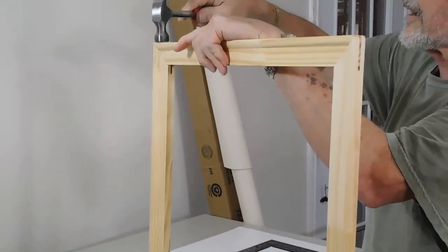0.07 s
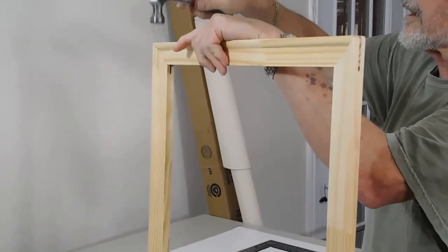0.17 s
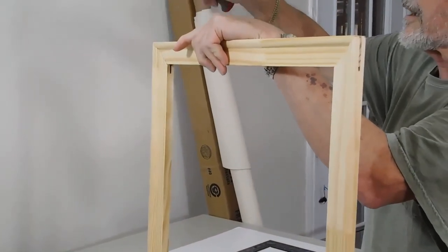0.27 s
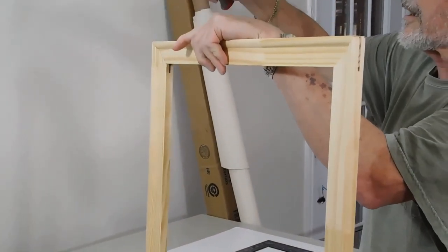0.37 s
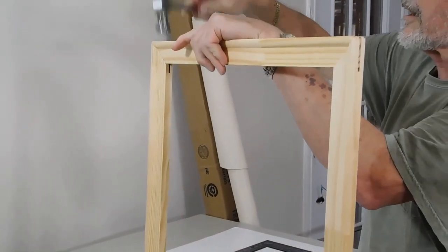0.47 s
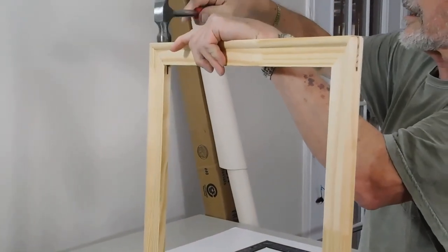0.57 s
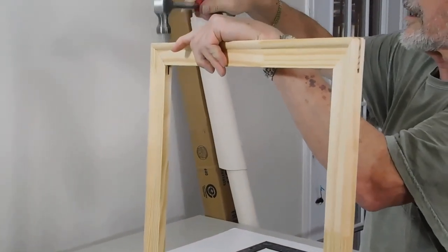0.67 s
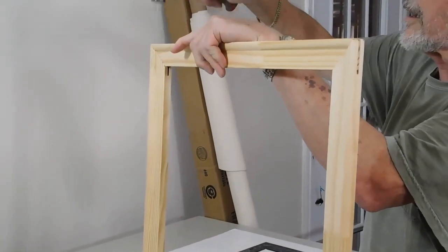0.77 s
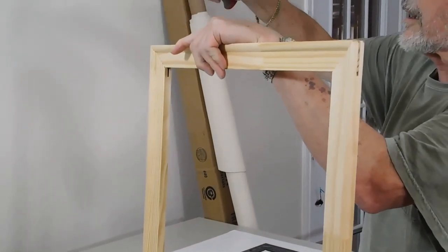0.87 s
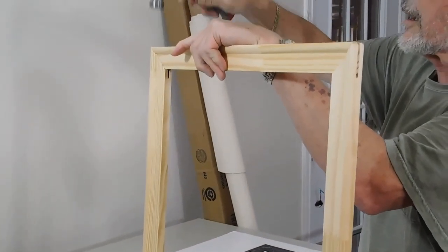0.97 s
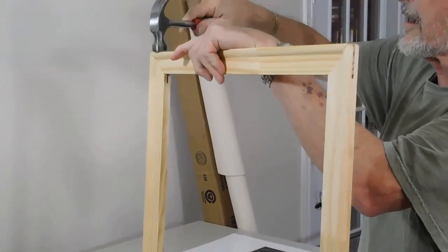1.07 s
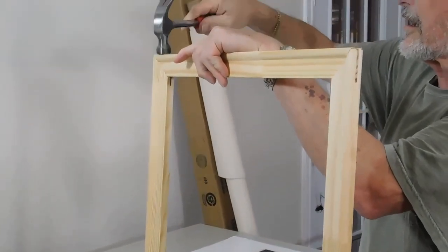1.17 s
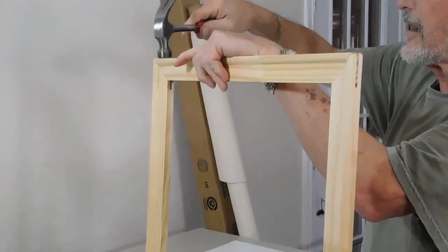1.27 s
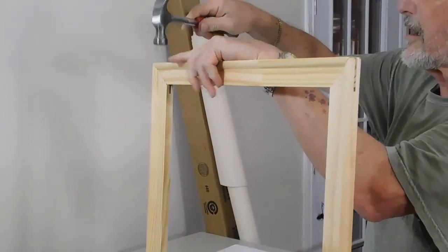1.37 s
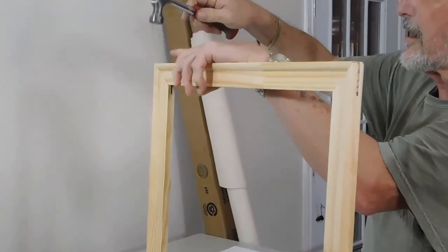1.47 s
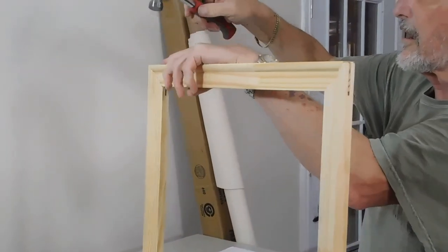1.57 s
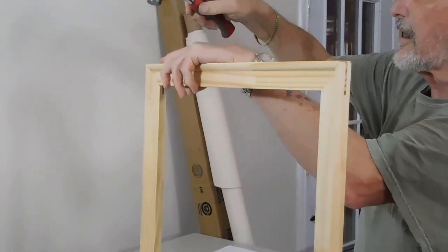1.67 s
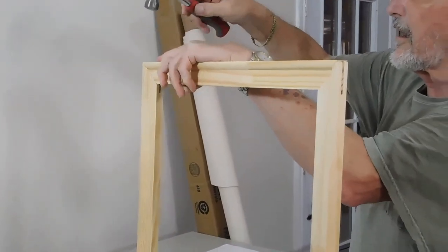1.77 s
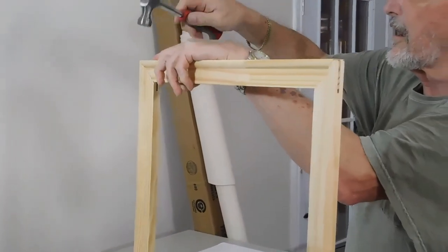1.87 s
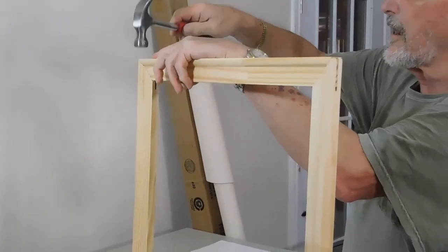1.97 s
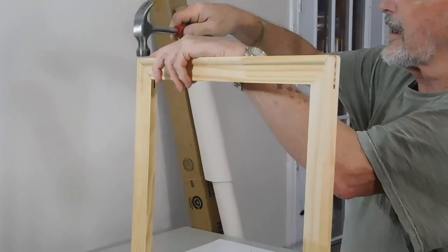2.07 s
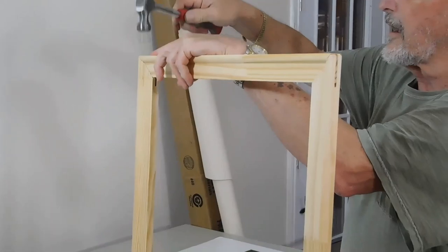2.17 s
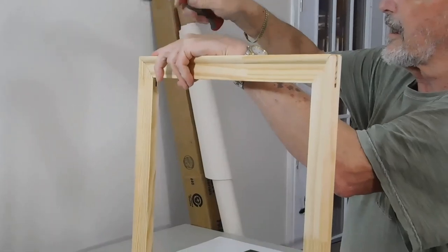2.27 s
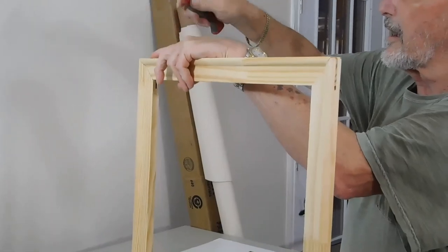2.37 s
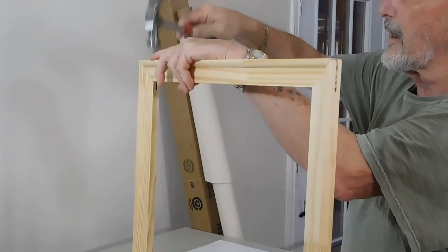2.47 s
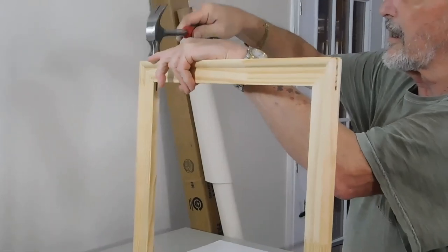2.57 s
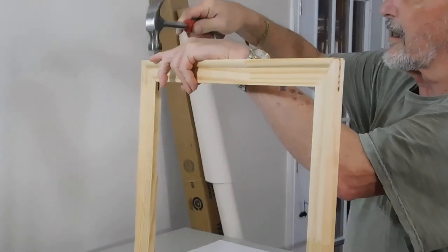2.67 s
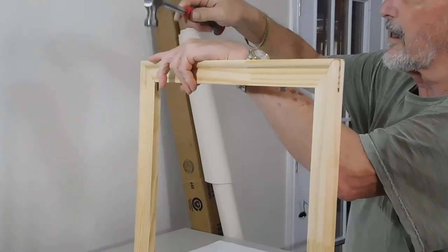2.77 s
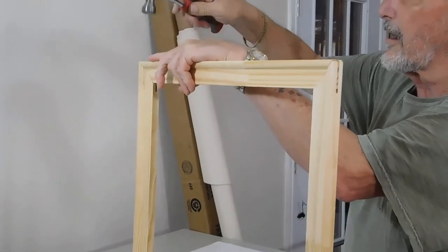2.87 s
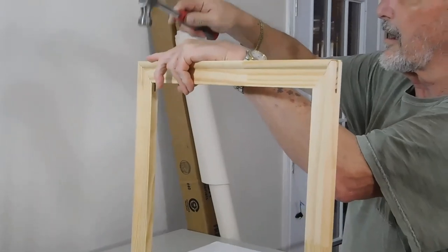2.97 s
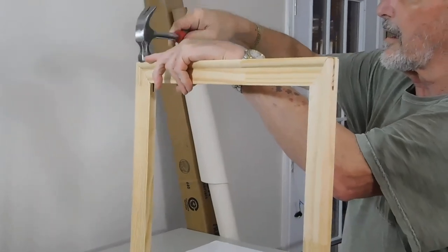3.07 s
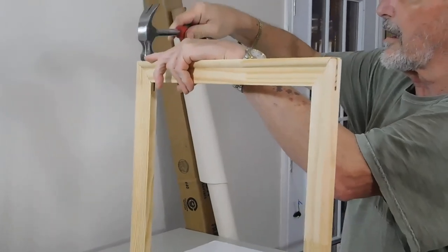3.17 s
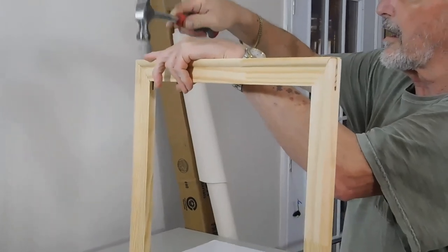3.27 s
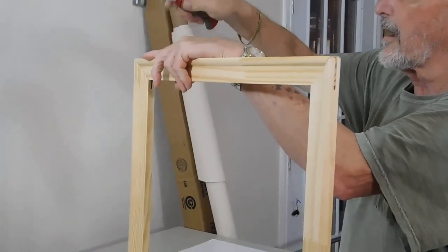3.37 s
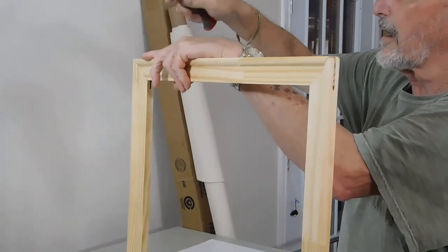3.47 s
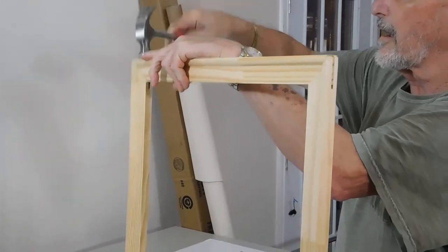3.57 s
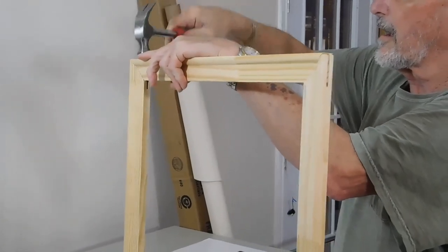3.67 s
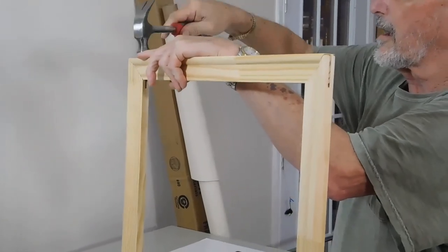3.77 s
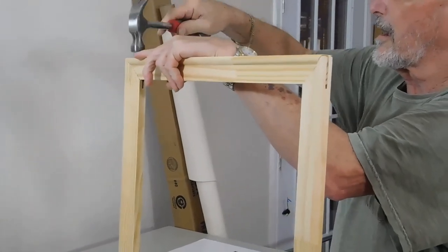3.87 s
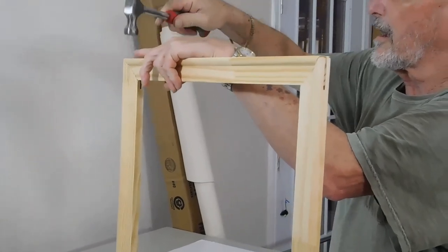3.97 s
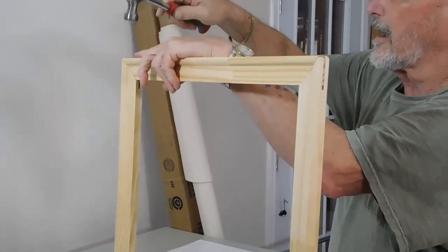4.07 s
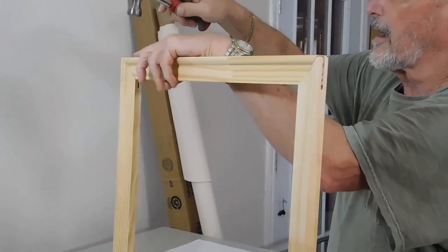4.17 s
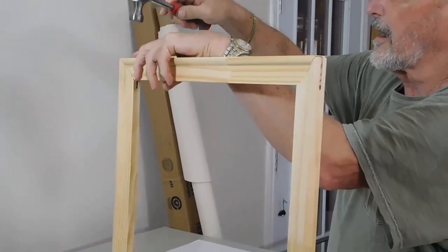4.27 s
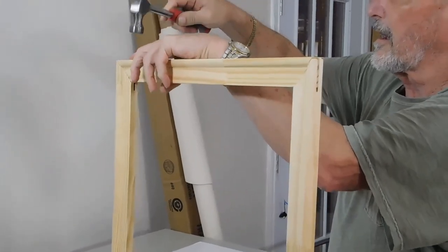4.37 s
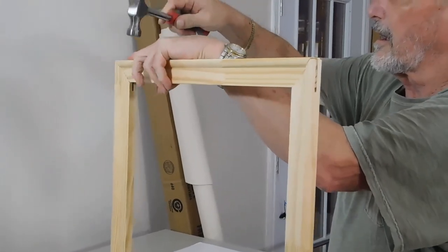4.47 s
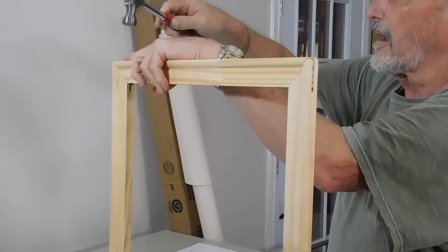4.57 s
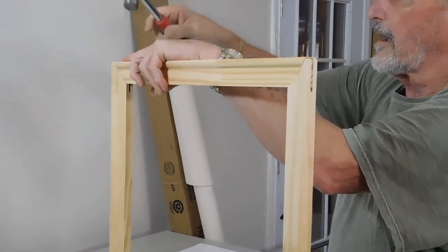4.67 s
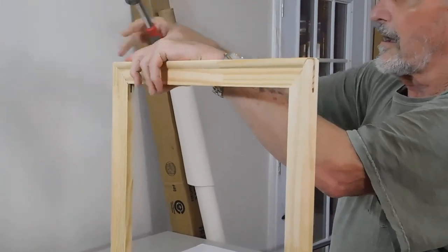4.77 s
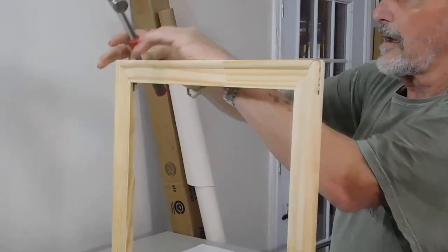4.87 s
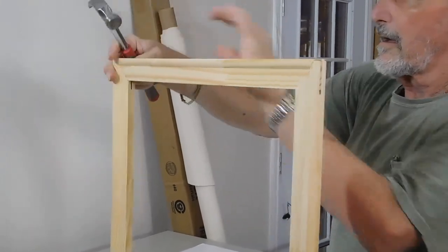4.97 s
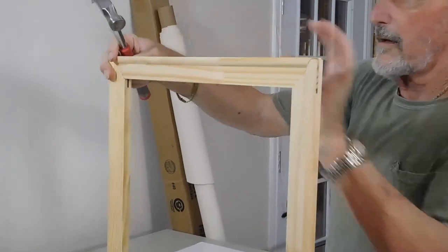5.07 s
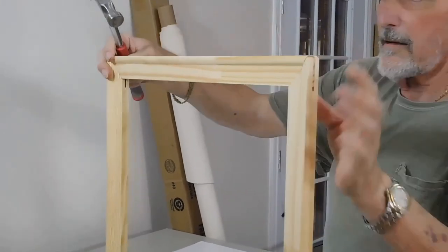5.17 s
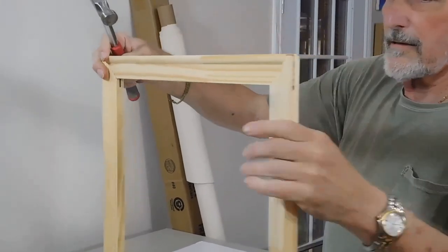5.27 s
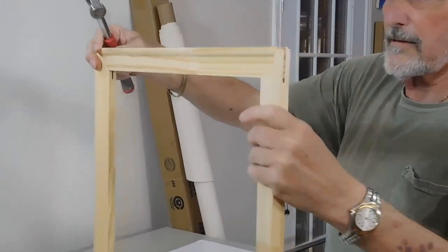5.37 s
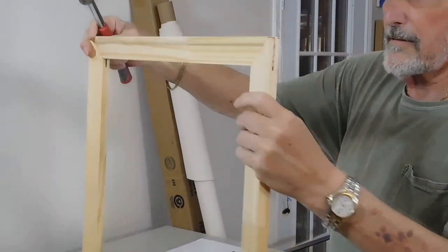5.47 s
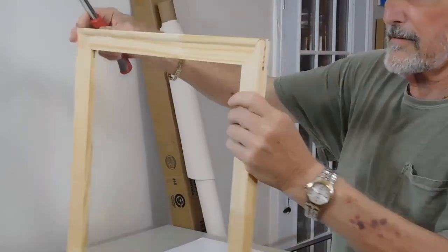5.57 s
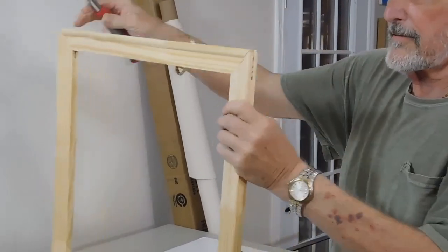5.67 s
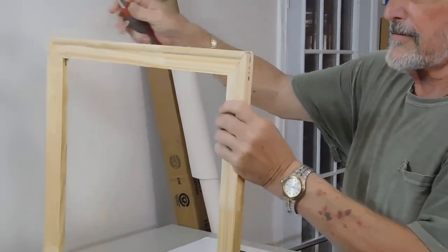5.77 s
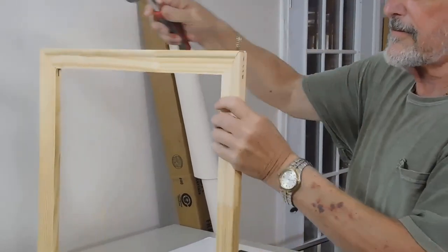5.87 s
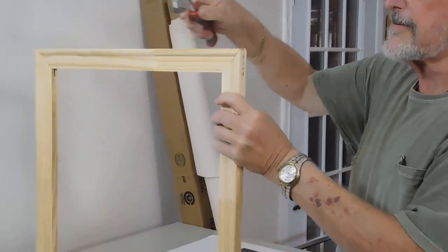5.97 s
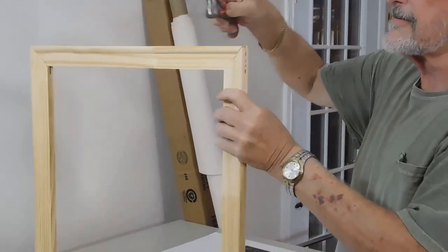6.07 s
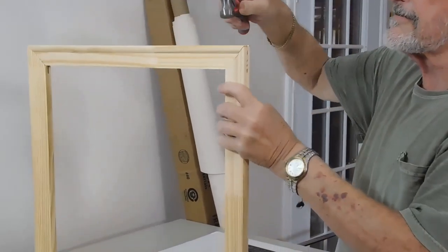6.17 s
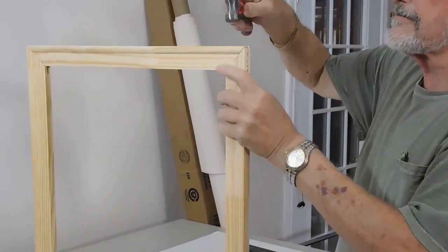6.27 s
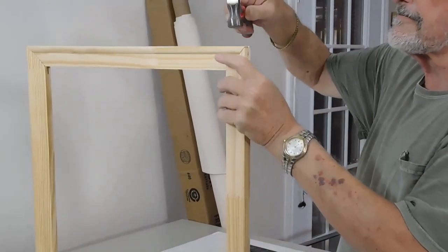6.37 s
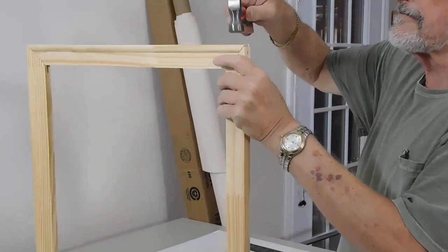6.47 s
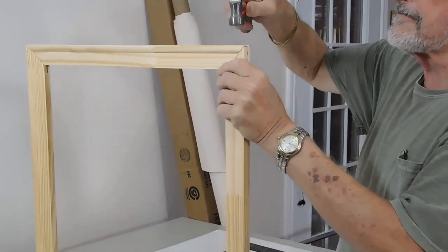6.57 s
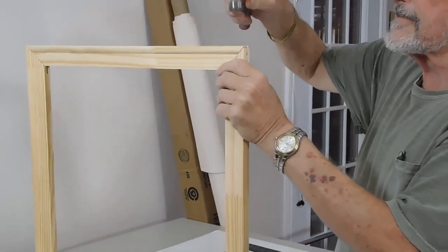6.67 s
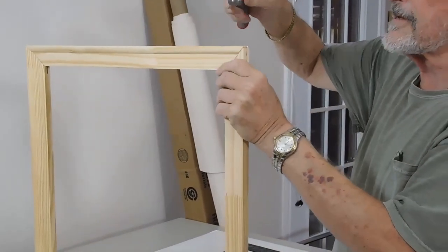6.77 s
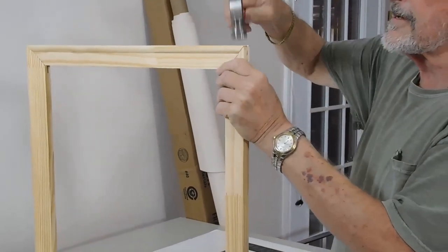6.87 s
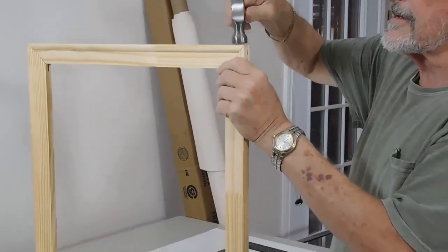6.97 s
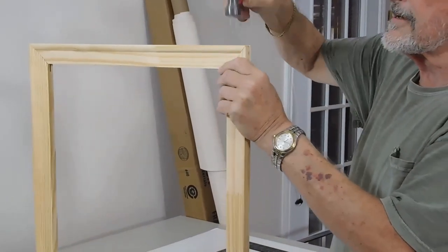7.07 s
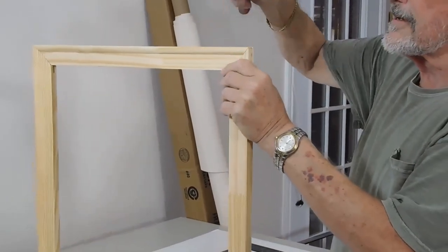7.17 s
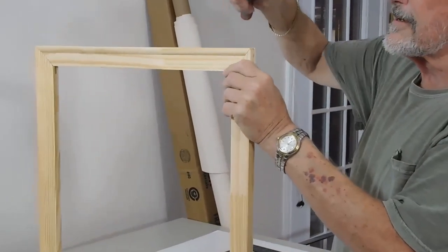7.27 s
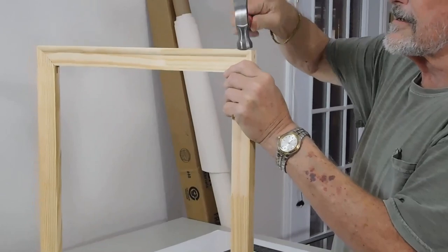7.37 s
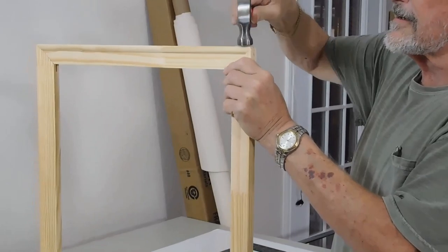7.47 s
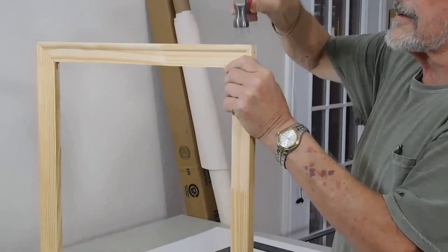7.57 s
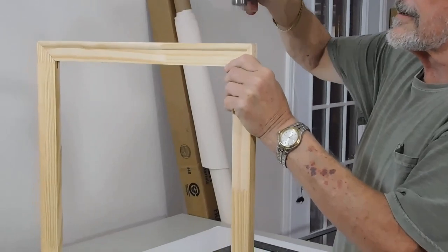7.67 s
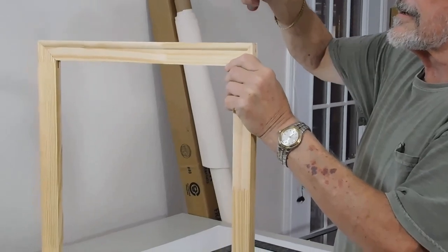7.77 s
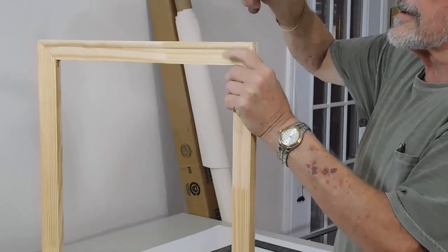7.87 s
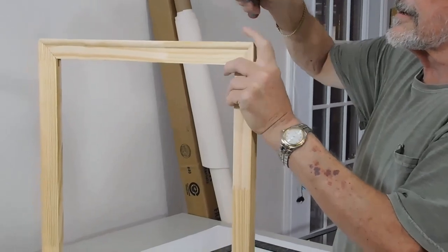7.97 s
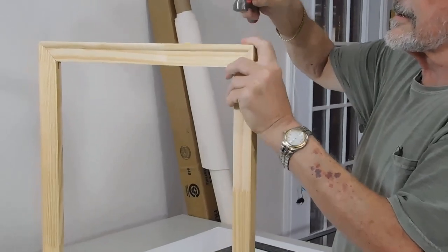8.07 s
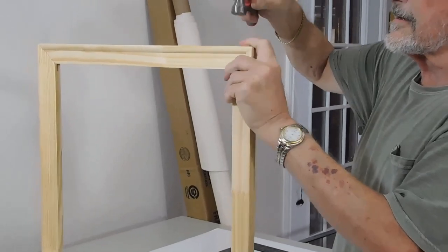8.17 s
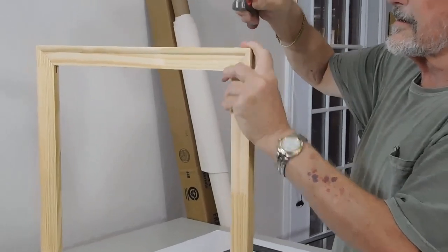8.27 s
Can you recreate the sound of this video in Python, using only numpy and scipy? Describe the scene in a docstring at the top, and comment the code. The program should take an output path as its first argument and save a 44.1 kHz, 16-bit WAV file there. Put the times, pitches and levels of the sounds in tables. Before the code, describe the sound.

In a hard, reverberant room with faint air noise and fan hum, a hammer strikes a light pine frame resting on a table. Loud, short woody knocks with a steely edge come about half a second apart, with one gap holding only a very weak tap. Then fingers tick, cloth rustles, the frame shifts and softly bumps the table. Two bright taps on the other corner follow, ending in a soft thumb rub. Close stereo microphone, peaks slightly squashed.

```python
"""A hard, echoing room with faint fan hum: a hammer taps the left corner of a pine frame on a table, seven times.
Fingers tick and cloth rustles, a hand rubs the wood, and the frame is shifted and bumps the table.
Two taps on the right corner follow, and last a thumb rubs over the joint.
Each blow rings short modes of wood and steel, cracks more the harder the contact, and can jolt the furniture.
At the microphones loud peaks round off; the recorder's limiter holds the blows down and lets go in the echo."""
import sys
import numpy as np
from scipy import signal
from scipy.fft import rfft, irfft
from scipy.io import wavfile

SR = 44100
rng = np.random.default_rng(int(sys.argv[2]) if len(sys.argv) > 2 else 0)


def generate_wav(sig):
    """Save sig (samples, or channels by samples) to the path in sys.argv[1] as 16-bit PCM at SR."""
    pcm = np.round(np.clip(np.atleast_2d(sig).T, -1, 1) * 32767).astype(np.int16)
    wavfile.write(sys.argv[1], SR, pcm)


N = 367220  # length of the scene in samples
SIZE = 2 ** 16  # length of one sound with its echo, in samples
FREQS = np.maximum(np.arange(SIZE // 2 + 1) * SR / SIZE, 1)  # Hz
AGE = np.arange(SIZE) / SR  # seconds since the start of a sound


def undb(db):
    """Decibels to gain."""
    return 10 ** (np.asarray(db) / 20)


def along(table, hz):
    """Read (Hz, value) points on a log-frequency axis."""
    points, values = np.transpose(table)
    return np.interp(np.log(hz), np.log(points), values)


def resonance(hz, width_hz, f=FREQS):
    """Response of one damped resonance, gain 1 at its centre."""
    return 1 / (1 + 1j * (f ** 2 - hz ** 2) / (f * width_hz))


def stereo(mid, side):
    """Left and right from mid and side."""
    return np.array([mid + side, mid - side])


def burst(decay_s):
    """Spectrum of a fading burst of noise with unit energy."""
    noise = rng.standard_normal(SIZE) * np.exp(-AGE / decay_s)
    return rfft(noise / np.sqrt(np.sum(noise ** 2)))


def grains(spread_db, swell):
    """Spectrum of noise in grains of uneven size, as a surface catches and slips, under a slow swell."""
    noise = rng.standard_normal(SIZE)
    sizes = undb(spread_db * rng.standard_normal(SIZE))
    return rfft(noise * sizes * swell)


def add(out, start_s, sound):
    """Mix a stereo sound in at a time; whatever lies outside the scene is cut off."""
    start = int(round(start_s * SR))
    a, b = max(start, 0), min(start + SIZE, N)
    out[:, a:b] += sound[:, a - start:b - start]


# hammer taps: start_s, force_db, contact_hz (cut-off of the contact),
# spot_hz (range that the struck spot favours), jolt_db (through the furniture)
HAMMER_TAPS = [(-.015, 9.5, 1560, 1560, -37), (0.539, 10, 1900, 1550, -25),
               (1.1052, 10.5, 1730, 1560, -28.5), (2.108, -10, 1800, 590, -70),
               (2.5766, 7, 5360, 1850, -22), (3.1122, 10, 1380, 1550, -25.5),
               (3.6628, 11.5, 4150, 1600, -16.5), (6.9435, 4, 4400, 2450, -17.5),
               (7.42, 6, 3970, 580, -27.5)]
SHIFT_S = 5.5  # taps before this time strike the left corner, later ones the right
SPOT_DB, PUSH_DB = 6, -2  # all taps: gain of the favoured range, bass pushed into the table


def hammering(room):
    """Each tap reaches the microphones through the room and, as a jolt, through the furniture."""
    out = np.zeros((2, N))
    for start_s, force_db, contact_hz, spot_hz, jolt_db in HAMMER_TAPS:
        blow = knock(start_s > SHIFT_S, contact_hz, PUSH_DB, spot_hz, SPOT_DB)
        airborne = irfft(blow * path(room))
        add(out, start_s, undb(force_db) * airborne + undb(jolt_db) * jolt())
    return out


def knock(right_corner, contact_hz, push_db, spot_hz, spot_db, table_hz=300, crack_hz=5000, crack_top_hz=9000):
    """Spectrum of one blow: ringing wood and steel, and the crack of their contact."""
    contact = 1 / (1 + 1j * FREQS / contact_hz)  # a softer contact lasts longer and is duller
    table = 1 + (undb(push_db) - 1) / (1 + 1j * FREQS / table_hz)
    spot = 1 + (undb(spot_db) - 1) * resonance(spot_hz, 0.35 * spot_hz)
    ring = (wood(right_corner) + steel()) * contact * table * spot
    crack = resonance(crack_hz, 5100) / (1 + 1j * FREQS / crack_top_hz)
    return ring + undb(crack_level(contact_hz)) * crack


# modes of the frame on its table: pitch_hz, width_hz, left_db and right_db (struck at that corner)
FRAME_MODES = [(57, 25, -17, -13), (150.6, 17, -13, -14), (228, 33.3, -8, -7), (271, 27, -6.5, -4.5),
               (390, 106, -10, -9.5), (596, 46, -5, -10.5), (666, 38, -5, -8), (740, 72, -3.5, -5),
               (896, 177, -5.5, -6.5), (1066, 113, -0.5, -2), (1260, 147, -1.84, 0.5), (1427, 127, -3, 2.2),
               (1540, 85, -1.7, 4), (1665, 140, -1.84, 0.5), (1926, 134, -4.5, 1.4), (2073, 95, 0.1, 3.5),
               (2652, 647, -4.5, 0.5), (2948, 366, -3.5, 1.5), (3475, 287, -7.5, -6),
               (4090, 297, -6.5, -2.5), (4580, 290, -10, -12), (4980, 234, -5, -4), (6120, 120, -14, -26),
               (6550, 214, -5, -6), (7380, 300, -13.5, -19)]


def wood(right_corner, scatter_db=1.45):
    """Response of the frame at one of its corners: a sum of short, damped modes."""
    # no two touches land on quite the same point, so each weights the modes a little differently
    weights = undb(scatter_db * rng.standard_normal(len(FRAME_MODES)))
    response = 0
    for k, (pitch_hz, width_hz, left_db, right_db) in enumerate(FRAME_MODES):
        level_db = right_db if right_corner else left_db
        # neighbouring modes swing in opposite senses, so the ring builds over a millisecond
        sense = (-1) ** k
        response = response + sense * weights[k] * undb(level_db) * resonance(pitch_hz, width_hz)
    return response


# ring of the steel hammer head: pitch_hz, width_hz, level_db
HAMMER_MODES = [(2500, 18, -11), (3235, 33, -11), (3820, 31, -7), (4420, 58, -19.5), (5900, 14.1, -7.5),
                (6680, 32, -5)]


def steel():
    """Response of the hammer head: narrow modes that ring longer than most of the wood's."""
    return sum(undb(level_db) * resonance(pitch_hz, width_hz) for pitch_hz, width_hz, level_db in HAMMER_MODES)


def crack_level(contact_hz, middling_hz=2400, middling_db=-18.5, db_per_octave=5.5):
    """Level of the crack in dB relative to the force: a harder contact cracks more."""
    return middling_db + db_per_octave * np.log2(contact_hz / middling_hz)


def jolt(thump_db=45.0, thump_hz=190, shudder_db=22.0, shudder_hz=120, shudder_s=0.038,
         fizz_db=4.0, fizz_hz=11000, fizz_s=.04):
    """Furniture carries a thump, alike at both microphones, and a brief shudder and fizz that differ at each."""
    noise = rng.standard_normal((2, 2, SIZE))
    thump = resonance(thump_hz, 103)
    shudder = rfft(noise[0] * np.exp(-AGE / shudder_s)) * resonance(shudder_hz, 490)
    fizz = rfft(noise[1] * np.exp(-AGE / fizz_s)) * resonance(fizz_hz, 9900)
    low = (undb(thump_db) * thump + undb(shudder_db) * shudder) / (1 + 1j * FREQS / 600)
    return irfft(low + undb(fizz_db) * fizz)


# bumps of the frame's foot on the table: start_s, force_db, contact_hz (cut-off of the contact),
# spot_hz (range that the spot favours), spot_db (gain of that range)
FOOT_BUMPS = [(5.75, -31.5, 4670, 1520, 4.5), (5.9429, -26.5, 1145, 1240, 16)]
BUMP_PUSH_DB = 5.5  # bass gain from the table


def shifting(room):
    """The frame knocks lightly on the table while it is moved, ringing as under a blow."""
    out = np.zeros((2, N))
    for start_s, force_db, contact_hz, spot_hz, spot_db in FOOT_BUMPS:
        blow = knock(True, contact_hz, BUMP_PUSH_DB, spot_hz, spot_db)
        add(out, start_s, undb(force_db) * irfft(blow * path(room, direct_db=26.5, room_db=0.0)))
    return out


# hand and thumb rubbing the frame: start_s, length_s, level_db (relative), centre_hz
WOOD_RUBS = [(4.947, 0.18, -65.5, 258), (8.076, 0.15, -64, 730), (8.219, 0.13, -76, 1000)]


def rubbing(room, grain_db=6.5, breadth=1.42):
    """Skin catches and slips on the wood and sets the frame's modes ringing softly."""
    out = np.zeros((2, N))
    for start_s, length_s, level_db, centre_hz in WOOD_RUBS:
        swell = np.sin(np.pi * np.minimum(AGE / length_s, 1)) ** 2
        slips = grains(grain_db, swell)
        rub = slips * wood(True) * resonance(centre_hz, breadth * centre_hz) ** 2
        add(out, start_s, undb(level_db) * irfft(rub * path(room, direct_db=35.0, room_db=1.5)))
    return out


# small ticks of fingers, handle and watch strap: start_s, level_db (relative), centre_hz, decay_s
HAND_TICKS = [(3.5098, -26, 3085, 0.0016), (4.917, -34, 3340, 0.024), (5.1908, -36, 8800, 0.013),
              (5.446, -30.5, 9900, 0.009), (6.6783, -37.5, 3170, 0.0065)]
# sleeve and palm sliding: middle_s, half_length_s, level_db (relative), centre_hz
SLEEVE_SLIDES = [(5.049, 0.1, -60, 1140), (5.33, 0.083, -62, 1950), (5.35, 0.57, -74.5, 7670),
                 (6.028, 0.11, -67, 6060), (6.298, 0.13, -65.5, 1220), (7.996, 0.04, -62.5, 3620)]


def handling(room, tick_direct_db=25.5, tick_room_db=-27.5, slide_db=-15.0, grain_db=6.0, slide_room_db=-7.5):
    """Dry ticks are brief filtered noise bursts; soft swishes are fibres that catch and slip."""
    out = np.zeros((2, N))
    tick_path = path(room, direct_db=tick_direct_db, room_db=tick_room_db)
    slide_path = path(room, direct_db=30.5, room_db=slide_room_db)
    for start_s, level_db, centre_hz, decay_s in HAND_TICKS:
        tick = burst(decay_s) * resonance(centre_hz, 0.56 * centre_hz)
        add(out, start_s, undb(level_db) * irfft(tick * tick_path))
    for middle_s, half_length_s, level_db, centre_hz in SLEEVE_SLIDES:
        swell = np.sin(np.pi * np.minimum(AGE / (2 * half_length_s), 1)) ** 2
        swish = grains(grain_db, swell) * resonance(centre_hz, 2.2 * centre_hz) ** 2
        add(out, middle_s - half_length_s, undb(level_db + slide_db) * irfft(swish * slide_path))
    return out


def path(room, direct_db=26.5, room_db=-2.0, moved=.35, lag_s=.00002, shade_hz=3000):
    """From frame to microphones: straight sound, shaded by the hand, plus partly new reflections each time."""
    left_lag = np.exp(-2j * np.pi * FREQS * lag_s)  # the left microphone hears it slightly later
    direct = np.array([left_lag, np.ones(len(FREQS))]) / (1 + 1j * FREQS / shade_hz)
    echo = np.sqrt(1 - moved) * room + np.sqrt(moved) * reflections()
    return undb(direct_db) * direct + undb(room_db) * echo


# reverberation of the room: pitch_hz, t60_s
ROOM_DECAY = [(60, 1), (250, 0.81), (700, 0.71), (1600, 0.7), (4000, 0.56), (7500, 0.67), (14000, 0.33)]
# width of the reverberation: pitch_hz, side_minus_mid_db
ROOM_WIDTH = [(60, -30.5), (110, -9.5), (200, -27.5), (380, -23), (700, -14.5), (1290, -9), (2380, -4.5),
              (4400, -0.5), (8120, -1.5), (15000, 2.5)]


def reflections(early_db=-0.5, early_s=0.015, gap_s=0.00047, grain_db=5.5):
    """Table and wall answer at once, then the whole room, each band of noise dying at its own rate."""
    centres = np.geomspace(40, 16000, 14)  # Hz
    # the first reflections come unevenly and merge into a smooth wash
    sizes = undb(grain_db * np.exp(-AGE / 0.15) * (rng.standard_normal(SIZE) - 0.66))
    noise = rfft(rng.standard_normal((2, SIZE)) * sizes)  # mid and side
    noise[1] *= undb(along(ROOM_WIDTH, FREQS))
    tail = 0
    for hz, one_band in zip(centres, np.eye(len(centres))):
        band = irfft(noise * np.interp(np.log(FREQS), np.log(centres), one_band))
        tail = tail + band * np.exp(-np.log(1000) * AGE / along(ROOM_DECAY, hz))
    onset = 1 - np.exp(-(AGE / gap_s) ** 2)
    early = 1 + undb(early_db) * np.exp(-AGE / early_s)
    return rfft(stereo(*(tail * onset * early)))


# spectrum of the room's steady air noise: pitch_hz, level_db (per Hz, relative)
AIR_SPECTRUM = [(15, -46), (25, -7), (64, -6), (200, -13.5), (277, -6), (317, -17), (354, -16), (463, -9),
                (545, -7.5), (1070, -6.5), (1330, -4.5), (1520, -8.5), (2220, -10), (5140, -19.5),
                (16000, -30)]
# width of the air noise: pitch_hz, side_minus_mid_db
AIR_WIDTH = [(60, -5.5), (110, -8.5), (200, -10), (380, -4.5), (700, -7.5), (1290, -2.5), (2380, -1),
             (4400, -1), (8120, -1), (15000, -2)]
# faint hum of a fan: pitch_hz, level_db
FAN_HUM = [(355.3, -73), (1297, -70), (1927, -79), (2191, -72)]
AIR_DB = -57.5  # mid level of the air noise before its drift


def air(waver=0.797, drift_db=3.25):
    """Room noise whose level drifts gently, with the fan's faint tones wavering in phase."""
    f = np.maximum(np.arange(N // 2 + 1) * SR / N, 1)
    t = np.arange(N) / SR
    mid, side = rfft(rng.standard_normal((2, N))) * undb(along(AIR_SPECTRUM, f))
    side = side * undb(along(AIR_WIDTH, f))
    noise = irfft(stereo(mid, side), N) / np.std(irfft(mid, N))
    drift = np.interp(t, np.linspace(0, t[-1], 40), rng.standard_normal(40))
    # each tone's phase takes a random walk
    wander = np.cumsum(rng.standard_normal((len(FAN_HUM), N)), axis=1) / np.sqrt(SR / 100)
    hum = 0
    for (pitch_hz, level_db), phase in zip(FAN_HUM, wander):
        hum = hum + undb(level_db) * np.sqrt(2) * np.sin(2 * np.pi * pitch_hz * t + waver * phase)
    return undb(AIR_DB + drift_db * drift) * noise + hum


def scene():
    """Hammer, frame, hands and air in one room."""
    room = reflections()
    return hammering(room) + shifting(room) + handling(room) + rubbing(room) + air()


def overload(x, headroom_db=0.0, skew=0.14):
    """The microphone stage rounds off loud peaks, one side more than the other, and drops the deepest bass."""
    top = undb(headroom_db)
    rounded = np.tanh(x / top)
    low_cut = signal.butter(1, 25, "high", fs=SR, output="sos")
    return signal.sosfilt(low_cut, top * (rounded + skew * rounded ** 2))


def limiter(x, ceiling_db=-7.5, release_db_per_s=41.5, attack_s=0.0012):
    """Turns loud sound down within milliseconds and recovers at a steady rate."""
    over_db = np.maximum(20 * np.log10(np.abs(x).max(axis=0) + 1e-9) - ceiling_db, 0)
    recovery_db = release_db_per_s * np.arange(N) / SR
    cut_db = np.maximum.accumulate(over_db + recovery_db) - recovery_db
    keep = np.exp(-1 / (attack_s * SR))
    # two smoothing stages delay the cut, so the very start of a blow passes almost unreduced
    for _ in range(2):
        cut_db = signal.lfilter([1 - keep], [1, -keep], cut_db)
    return x * undb(-cut_db)


TOP_HZ = 15900  # the recorder's upper limit


def record(dry):
    """Microphone overload, limiter, full-scale clipping and a steep top cut."""
    clipped = np.clip(limiter(overload(dry)), -1, 1)
    top_cut = signal.ellip(10, .2, 70, TOP_HZ, fs=SR, output="sos")
    return signal.sosfilt(top_cut, clipped)


dry = scene()
out = record(dry)
generate_wav(out)
```